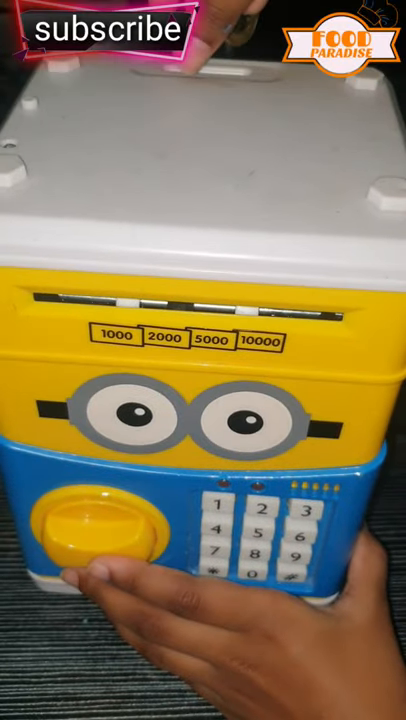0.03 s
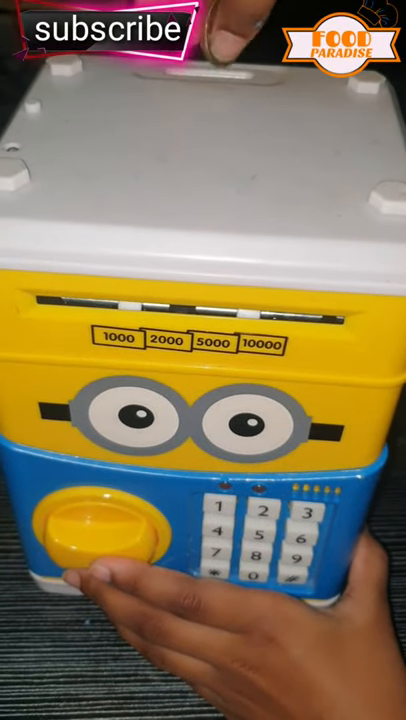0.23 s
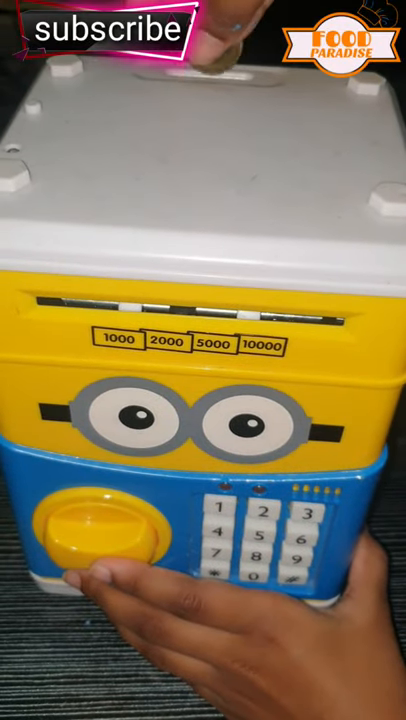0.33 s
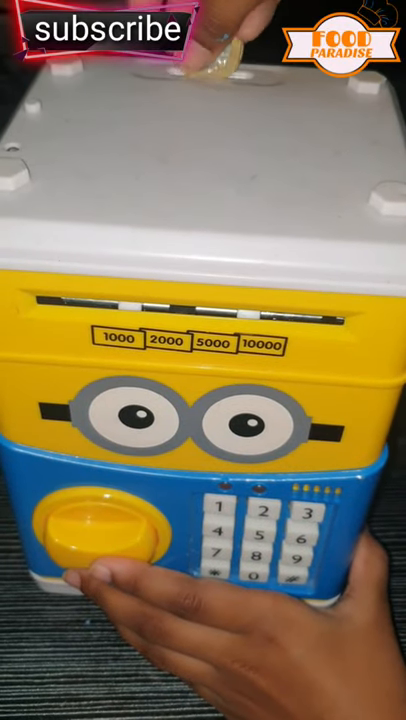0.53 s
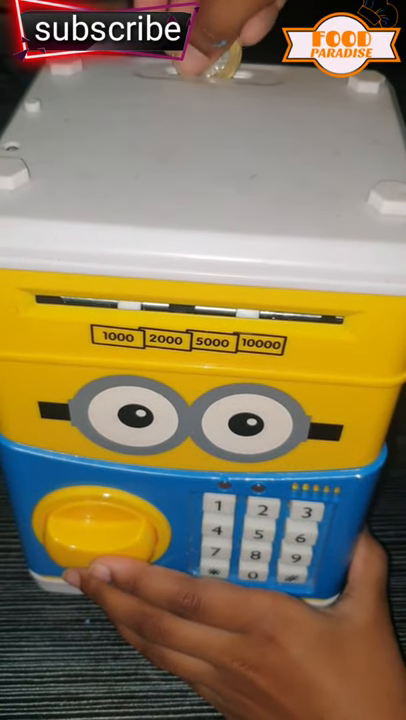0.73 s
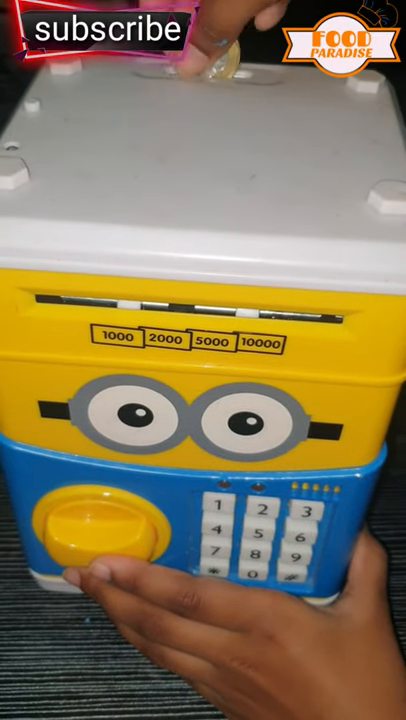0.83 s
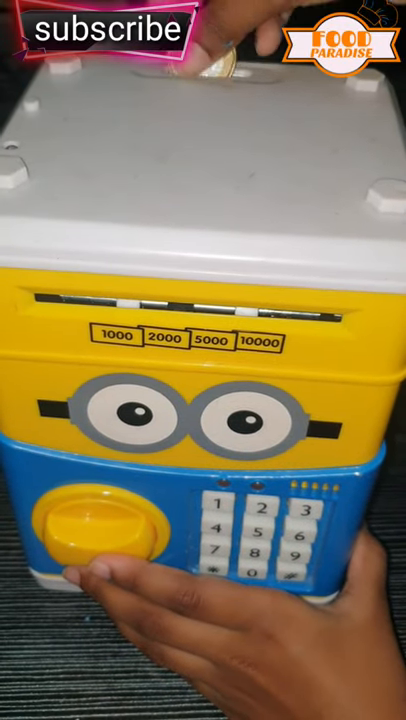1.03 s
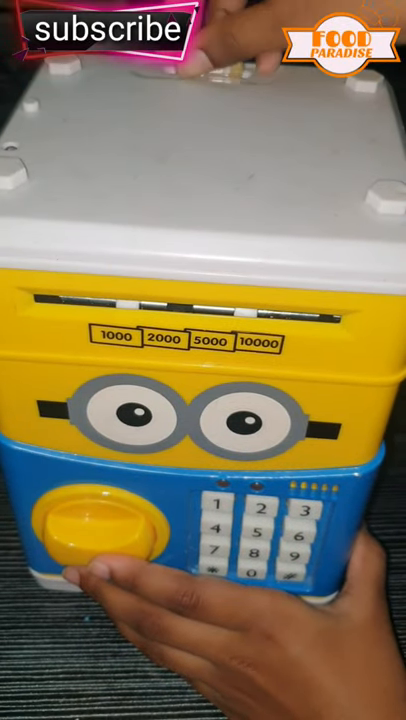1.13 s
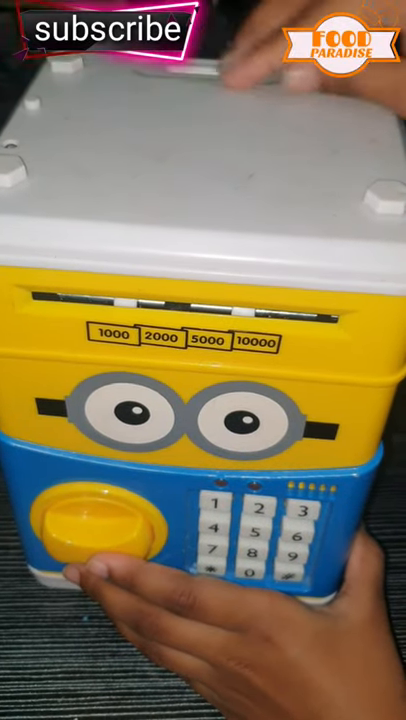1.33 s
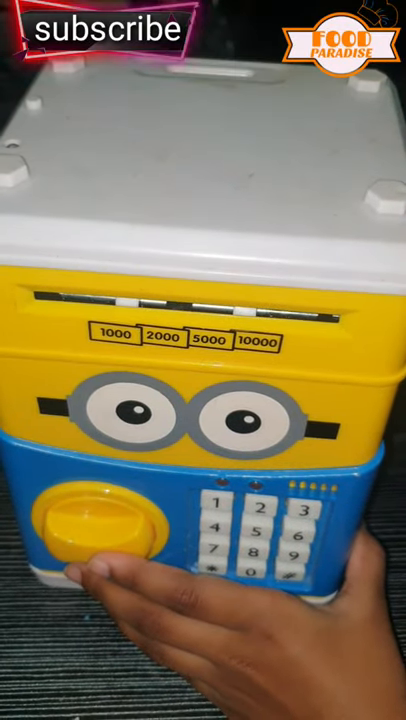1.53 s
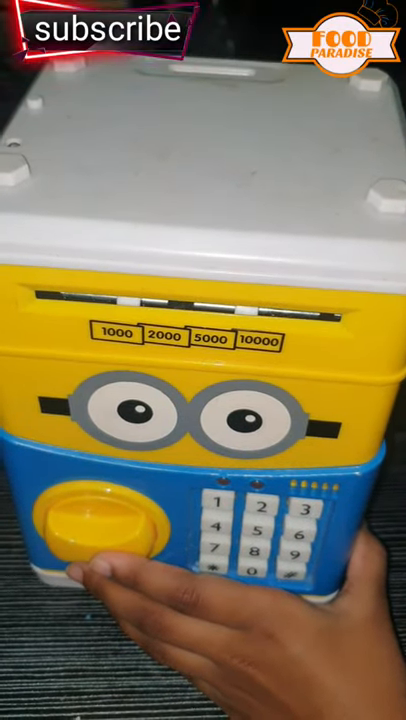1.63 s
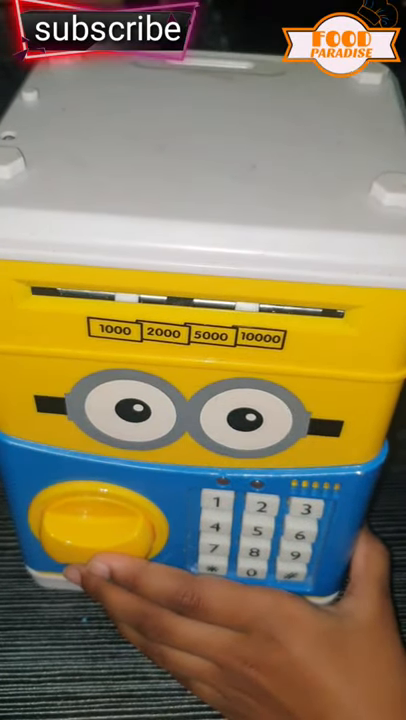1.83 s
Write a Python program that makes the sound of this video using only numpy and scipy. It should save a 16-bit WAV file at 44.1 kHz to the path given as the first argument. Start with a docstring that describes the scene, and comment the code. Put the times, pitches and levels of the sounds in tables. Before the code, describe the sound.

Coins clatter inside a small plastic money box, two boxy thuds with quick rattling bounces

```python
"""Two coins are pushed through the slot of a hollow plastic toy bank in a small room.
Each lands with a boxy thump (low box modes) and a clack (shaped noise over damped wall modes), then bounces.
Fingers and coins tick on the lid in between, exciting the lid's own modes.
A diffuse tail gives the room, filtered noise its low rumble; the hardest blows overload the close microphone."""
import sys
import numpy as np
from scipy import signal
from scipy.fft import rfft, irfft
from scipy.io import wavfile

SR = 44100
rng = np.random.default_rng(int(sys.argv[2]) if len(sys.argv) > 2 else 0)


def inscribe(sig):
    """Save sig as 16-bit PCM at rate SR to the path in sys.argv[1].

    A 1-D sig is mono; a 2-D sig holds one channel per row.
    Samples are clipped to [-1, 1] before scaling.
    """
    pcm = np.round(np.clip(np.atleast_2d(sig).T, -1, 1) * 32767)
    wavfile.write(sys.argv[1], SR, pcm.astype(np.int16))


N = 83790  # length [samples]


def from_db(db):
    """Logarithmic level: decibels become an amplitude ratio."""
    return 10 ** (np.asarray(db) / 20)


def at_hz(points, hz):
    """Logarithmic pitch: interpolate a table linearly along log frequency."""
    table_hz, value = np.transpose(points)
    return np.interp(np.log(np.maximum(hz, 1)), np.log(table_hz), value)


def add(out, start_s, sound):
    """Superposition: mix a stereo sound in at a time."""
    start = int(start_s * SR)
    part = sound[:, :max(N - start, 0)]
    out[:, start:start + part.shape[1]] += part


def panned(pan_db):
    """Level difference between channels: left and right gains of constant total power."""
    gains = from_db(np.array([pan_db, -pan_db]) / 2)
    return gains / np.sqrt(np.mean(gains ** 2, axis=0))


def exponential_decay(t, t60_s):
    """Exponential damping: the amplitude falls by 60 dB in t60_s."""
    return np.exp(-np.log(1000) * t / t60_s)


# correlation of the two channels in a diffuse field: (frequency [Hz], correlation [-1 to 1])
CHANNEL_CORRELATION = [(60, .93), (200, .92), (350, .85), (700, .5), (1500, .1), (8000, 0)]


def diffuse_noise(size):
    """Diffuse-field coherence: stereo noise alike in the bass and unrelated in the treble."""
    mid, side = rfft(rng.standard_normal((2, size)))
    alike = np.clip(at_hz(CHANNEL_CORRELATION, np.fft.rfftfreq(size, 1 / SR)), -1, 1)
    mid = np.sqrt((1 + alike) / 2) * mid
    side = np.sqrt((1 - alike) / 2) * side
    return irfft(mid + side * [[1], [-1]], size)


# spectrum of the rumble: (frequency [Hz], relative level [dB])
RUMBLE_SPECTRUM = [(25, -31.5), (45, -16.5), (66, -2), (90, -10.5), (115, -10), (150, -6.5), (280, -14.5),
                   (450, -21.5), (900, -26), (2500, -33.5), (5000, -48.5), (15000, -57.5)]
# course of the rumble's RMS level: (time [s], level [dB re full scale])
RUMBLE_LEVEL = [(0, -40.5), (.09, -36.5), (.2, -40), (.45, -47), (1.0, -47.5), (1.3, -46.5), (1.9, -45.5)]


def rumble():
    """Spectral shaping: white noise weighted to the room's quiet, bass-heavy background."""
    colour = from_db(at_hz(RUMBLE_SPECTRUM, np.fft.rfftfreq(N, 1 / SR)))
    noise = irfft(rfft(diffuse_noise(N)) * colour, N)
    level_db = np.interp(np.arange(N) / SR, *np.transpose(RUMBLE_LEVEL))
    return noise / noise.std() * from_db(level_db)


TILT_PIVOT_HZ = 2200  # treble tilts turn about this frequency


def tilt(hz, tilt_db):
    """Spectral slope: level in dB for a tilt in dB per octave."""
    return tilt_db * np.log2(hz / TILT_PIVOT_HZ)


def ring(modes, tilt_db, spread_db):
    """Modal synthesis: one blow sums damped sines, each of a strength varied at random by spread_db."""
    hz, level_db, t60_s, pan_db = np.transpose(modes)
    t = np.arange(SR // 2) / SR
    varied_db = level_db + tilt(hz, tilt_db) + spread_db * rng.standard_normal(len(hz))
    gain = from_db(varied_db) * (-1) ** np.arange(len(hz))  # neighbouring modes alternate in polarity
    sines = np.sin(2 * np.pi * hz[:, None] * t) * exponential_decay(t, t60_s[:, None])
    return (gain * panned(pan_db)) @ sines


# resonances of the hollow box and its floor:
# (frequency [Hz], relative level [dB], 60 dB decay time [s], left minus right [dB])
BOX_MODES = [(234, -18.5, 0.15, 5), (272, -5.5, 0.044, -1), (349.9, 2, 0.05, -0.5), (352.2, -9, 0.23, 0.5),
             (379, -13, 0.079, -8.5), (456, -12, 0.088, 1.5), (478.7, -16.5, 0.19, -10.5),
             (574, -11, 0.021, 10.5), (688, -15, 0.027, 10.5)]


def box_thump():
    """Low-order resonance: the hollow box and its floor ring at a few low modes."""
    return ring(BOX_MODES, 0, 0)


CHATTER_DB, CHATTER_REF_S = 1, .004  # after-contact energy re the first contact, for a run of CHATTER_REF_S


def chatter(length_s, count=12):
    """Repeated impact: energy of a first contact and more as the rim slaps down; longer runs take a greater share."""
    length_s = abs(length_s)
    when_s = (np.arange(count) + rng.random(count)) / count * length_s
    energy = rng.exponential(1, count)
    total = from_db(CHATTER_DB) ** 2 * length_s / CHATTER_REF_S
    clicks = np.zeros(int(length_s * SR) + 2)
    np.add.at(clicks, 1 + (when_s * SR).astype(int), total * energy / energy.sum())
    clicks[0] = 1
    return clicks / clicks.sum()


# spectrum of the dense, quickly damped modes of the plastic: (frequency [Hz], relative level [dB])
CLACK_SPECTRUM = [(450, -5.5), (620, -9.5), (850, -3), (1150, 0.5), (1600, 3), (2600, 0.5), (3600, 0),
                  (5000, -7), (6800, -7.5), (8900, -20), (11300, -12.5), (13000, -18), (15500, -24.5)]
# stereo balance of those modes: (frequency [Hz], left minus right [dB])
CLACK_BALANCE = [(600, -2.5), (1050, 10.5), (1500, 1), (2400, -7.5), (3600, -5.5), (6000, 0.5), (12000, 0)]
CLACK_T60_S, ATTACK_S = 0.058, 0.00068  # decay time, and time constant of the onset
CRACK_DB, CRACK_T60_S = -1, 0.015  # the quick first part, re the slower decay
SPOT_DB, SPOT_WIDTH_OCT = 4, .15  # broad resonance of the struck spot
CUTOFF_HZ = 15400  # top of the audible band here


def clack(tilt_db, chatter_s, spot_hz, size=8192):
    """High modal density: countless modes act as noise, strongest near the struck spot's pitch."""
    hz = np.fft.rfftfreq(size, 1 / SR) + 1
    t = np.arange(size) / SR
    spot_db = SPOT_DB * np.exp(-.5 * (np.log2(hz / spot_hz) / SPOT_WIDTH_OCT) ** 2)
    colour = from_db(at_hz(CLACK_SPECTRUM, hz) + spot_db + tilt(hz, tilt_db))
    colour = colour * (hz > CLACK_SPECTRUM[0][0]) * (hz < CUTOFF_HZ)
    random_phase = np.exp(2j * np.pi * rng.random((2, len(hz))))
    modes = irfft(colour * panned(at_hz(CLACK_BALANCE, hz)) * random_phase)

    crack = from_db(CRACK_DB) * exponential_decay(t, CRACK_T60_S)
    one_contact = (1 - np.exp(-t / ATTACK_S)) * (exponential_decay(t, CLACK_T60_S) + crack)
    energy = np.convolve(one_contact ** 2, chatter(chatter_s))[:size]  # contacts add in energy
    return np.sqrt(energy) * modes / modes.std()


THUMP_LAG_S, MODE_SPREAD_DB = 0.00301, 4  # thump's delay after the contact; random spread of mode strengths


def bank(contacts, modes, modes_db, clack_db):
    """Impact excitation: each contact sets off the dense clack, the clear modes and the box's thump."""
    out = np.zeros((2, N))
    thump = box_thump()
    for start_s, level_db, thump_db, tilt_db, chatter_s, spot_hz in contacts:
        add(out, start_s, from_db(level_db + clack_db) * clack(tilt_db, chatter_s, spot_hz))
        add(out, start_s, from_db(level_db + modes_db) * ring(modes, tilt_db, MODE_SPREAD_DB))
        add(out, start_s + THUMP_LAG_S, from_db(thump_db) * thump)
    return out


# fingers and coin touch the lid: (time [s], relative level of clack and modes [dB], relative thump level [dB],
# treble tilt [dB per octave], chatter [s], pitch of the struck spot [Hz])
LID_TOUCHES = [(0.076, -58, -29, 0, 0.0098, 1100), (0.0988, -23, -25, -3, .003, 2280),
               (1.156, -50, -51, -4.5, 0.0073, 1390), (1.257, -41.5, -48, -4.5, 0.0056, 2300),
               (1.264, -32.5, -29.5, -3.5, 0.02, 1100), (1.287, -44, -48, -5, 0.0052, 1100),
               (1.356, -45.5, -27.5, -1, .005, 600), (1.857, -46, -43, 1.5, .008, 3200)]
# the lid's resonances under a finger or a coin's edge:
# (frequency [Hz], relative level [dB], 60 dB decay time [s], left minus right [dB])
LID_MODES = [(268.4, -23, 0.23, -2), (368.4, -11.5, 0.071, 0.29), (1060, -17, 0.047, 1.5),
             (1500, -18.5, 0.034, 1.2), (1733, -16.5, 0.079, -1.5), (1788, -15.5, 0.052, 6),
             (2330, -11, 0.037, 6.5)]


def lid_touches():
    """Plate resonance: light contacts excite the lid's own modes."""
    return bank(LID_TOUCHES, LID_MODES, modes_db=8, clack_db=-3)


# a coin strikes inside the bank: (time [s], relative level of clack and modes [dB], relative thump level [dB],
# treble tilt [dB per octave], chatter [s], pitch of the struck spot [Hz])
COIN_BLOWS = [(0.2305, -4, 0.5, -2.5, 0.0032, 2520), (0.248, -15, -48, 4.5, 0.021, 6000),
              (0.262, -17, -29, 5, .014, 3000), (0.283, -12.5, -22, -1.5, .004, 1700),
              (0.4133, -27, -22, 0, .002, 2200), (0.4286, -7, -10.5, -.5, .0005, 1300),
              (0.5279, -10, -14, 0, .0005, 3500), (0.5486, -9, -20.5, 1, 0.00048, 3700),
              (0.567, -21, -29, 7, 0.0018, 5000), (0.581, -19.5, -23.5, -2.5, .001, 1450),
              (0.6238, -24, -23, 3.5, 0.0029, 11300), (0.636, -26.5, -53, -6, 0.0044, 3300),
              (0.654, -25, -36, 0, .008, 3400), (0.6995, -20.5, -27, -0.1, 0.00059, 870),
              (0.7296, -26, -47, -0.8, 0.0038, 880), (0.7605, -28, -40.5, 0, 0.0022, 2200),
              (0.7885, -27.5, -42.5, -.4, 0.0054, 950), (0.8133, -26, -37.5, -1.5, .001, 1600),
              (0.830, -36.5, -36, -2, 0.0045, 1000), (0.8444, -31, -34, -0.3, 0.0018, 1500),
              (1.4378, -4.5, 0, -1.64, 0.0047, 1080), (1.457, -13, -4.5, 3, .004, 1100),
              (1.476, -15.5, -20, 4.5, .012, 2600), (1.5081, -12, -13.5, -0.5, .002, 1550),
              (1.529, -24.5, -35, 5, .002, 4000), (1.5665, -17.5, -21.5, .4, 0.002, 4100),
              (1.578, -12, -28, 0.7, 0.0027, 4300), (1.584, -11.5, -18.5, 3, 0.004, 4200),
              (1.6239, -17.5, -28, -0.5, .002, 1000), (1.640, -32.5, -34, -8, .01, 4200),
              (1.6633, -27, -37, -2.5, .004, 4200), (1.692, -42, -46, -1, .005, 1030)]
# the strongest wall resonances:
# (frequency [Hz], relative level [dB], 60 dB decay time [s], left minus right [dB])
WALL_MODES = [(698, -31.5, 0.095, 9), (840.5, -17.5, 0.082, 1), (943, -19.5, 0.05, 7.5),
              (1041, -15.5, 0.068, -7), (1091, -12, .1, 2), (1170, -19, 0.092, -13.5),
              (1489, -7, 0.045, -18), (1601, -9.5, 0.042, -16), (1765, -21, .1, -11), (1880, -14, 0.04, -6),
              (2150, -29, 0.48, 11), (2200, -14.5, 0.089, 26.5), (3375, -18, .06, 2),
              (4270, -18, 0.049, 7.5)]


def coin_blows():
    """Wall resonance: each landing or bounce of a coin excites the modes of the plastic walls."""
    return bank(COIN_BLOWS, WALL_MODES, modes_db=2, clack_db=0.5)


RADIATION_HZ = 108  # the small box radiates little below this


def radiated(x):
    """Radiation efficiency: a high-pass, for a source small against the wavelength."""
    return signal.sosfilt(signal.butter(2, RADIATION_HZ, "high", fs=SR, output="sos"), x)


# strength of the room's tail: (frequency [Hz], relative level [dB])
ROOM_LEVEL = [(150, -8.5), (350, -7), (700, -5), (1500, -6), (3500, -7), (7000, -3), (14000, -5)]
# reverberation time: (frequency [Hz], 60 dB decay time [s])
ROOM_DECAY = [(200, 0.38), (1000, 0.34), (4000, .42), (13000, 0.32)]
ROOM_BUILD_S = 0.0048  # time constant of the build-up


def room(x):
    """Statistical reverberation: a diffuse noise tail builds up quickly and dies band by band."""
    t = np.arange(SR) / SR
    edges = np.geomspace(120, 17000, 13)  # band edges [Hz]
    tail = 0
    for low, high in zip(edges, edges[1:]):
        hz = np.sqrt(low * high)
        band_pass = signal.butter(2, [low, high], "band", fs=SR, output="sos")
        band = signal.sosfilt(band_pass, diffuse_noise(SR))
        band = band * (1 - np.exp(-t / ROOM_BUILD_S)) * exponential_decay(t, at_hz(ROOM_DECAY, hz))
        band = band / np.linalg.norm(band, axis=1, keepdims=True)
        bandwidth_gain = np.sqrt(2 * (high - low) / SR)  # energy in proportion to bandwidth
        tail = tail + band * bandwidth_gain * from_db(at_hz(ROOM_LEVEL, hz))
    return signal.fftconvolve(x, tail, axes=1)[:, :N]


def scene():
    """Superposition: direct sound of coins and fingers, its reverberation and the rumble."""
    direct = radiated(coin_blows() + lid_touches())
    return direct + room(direct) + rumble()


OVERLOAD = 1.0  # clipping amplitude [full scale]


def record(dry):
    """Hard clipping and band limiting: the loudest peaks are flattened, then the top is cut."""
    clipped = np.clip(dry, -OVERLOAD, OVERLOAD)
    low_pass = signal.ellip(10, .2, 70, CUTOFF_HZ, fs=SR, output="sos")  # ripple .2 dB, stop band 70 dB down
    return signal.sosfilt(low_pass, clipped)


dry = scene()
out = record(dry)
inscribe(out)
```